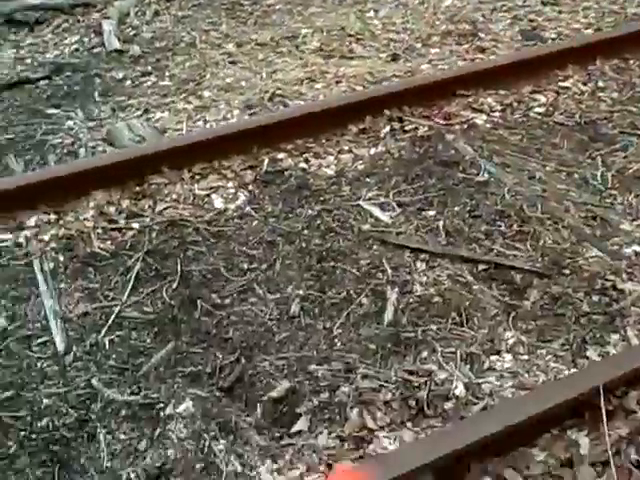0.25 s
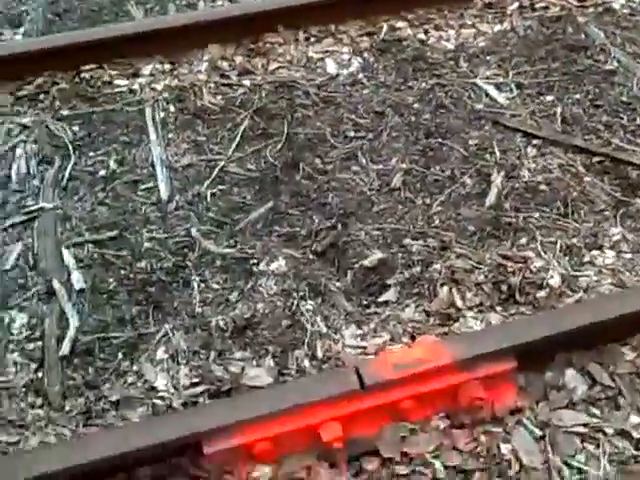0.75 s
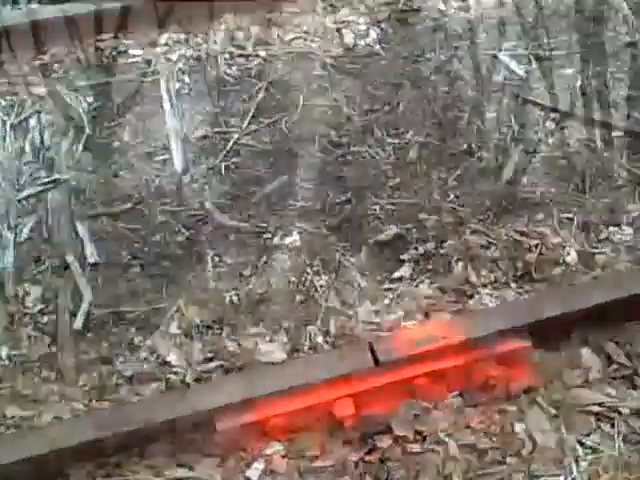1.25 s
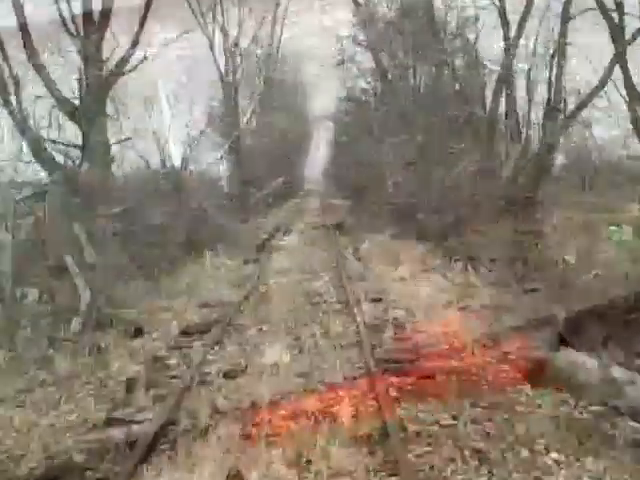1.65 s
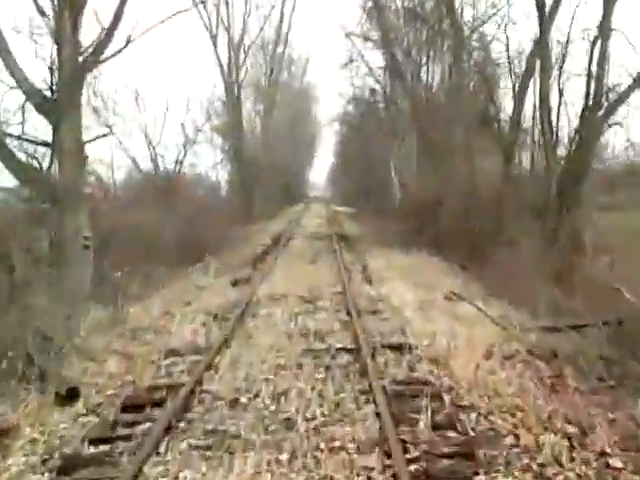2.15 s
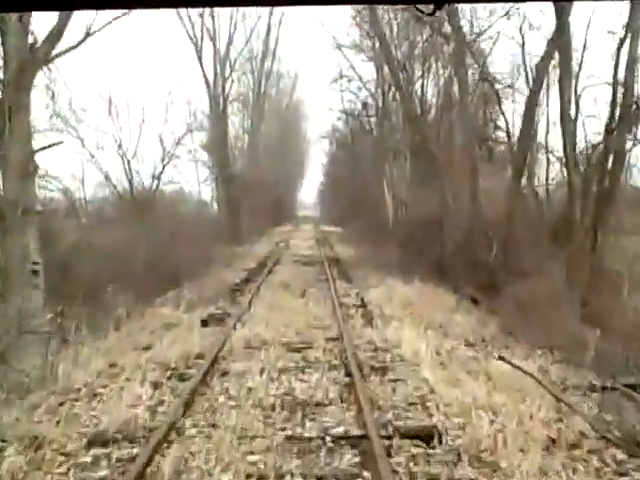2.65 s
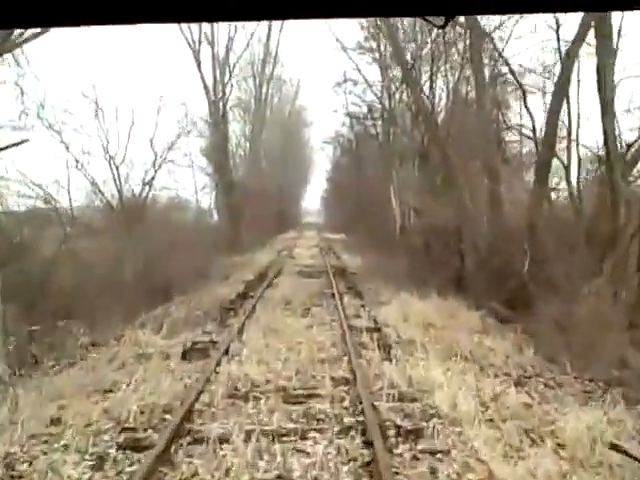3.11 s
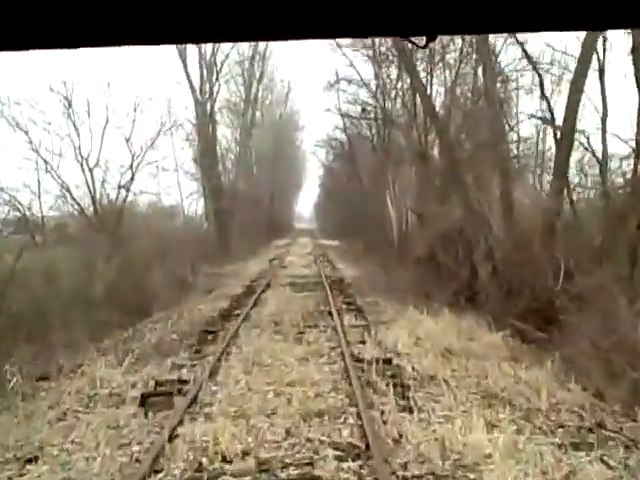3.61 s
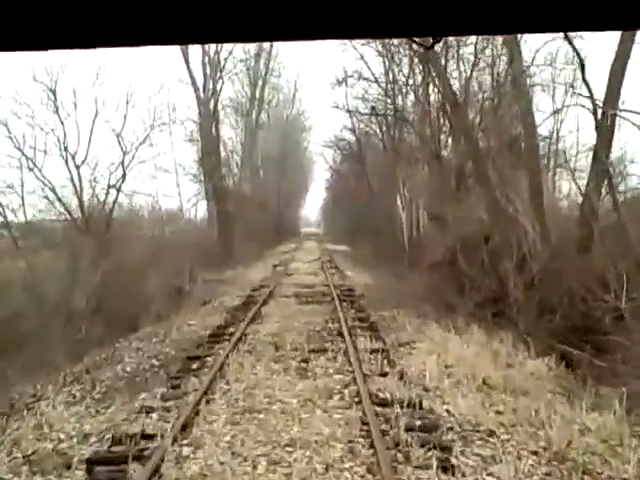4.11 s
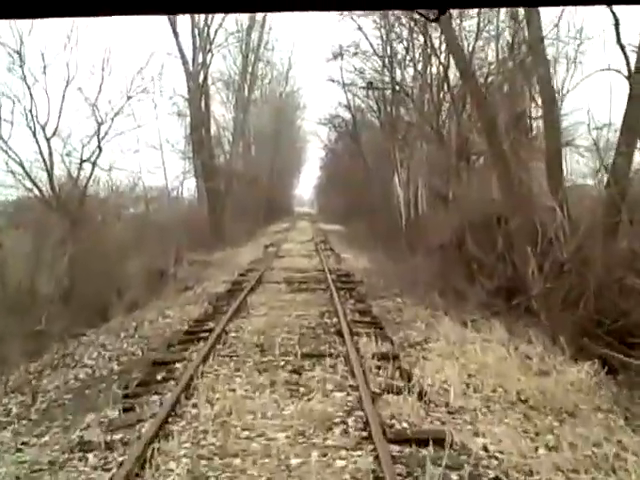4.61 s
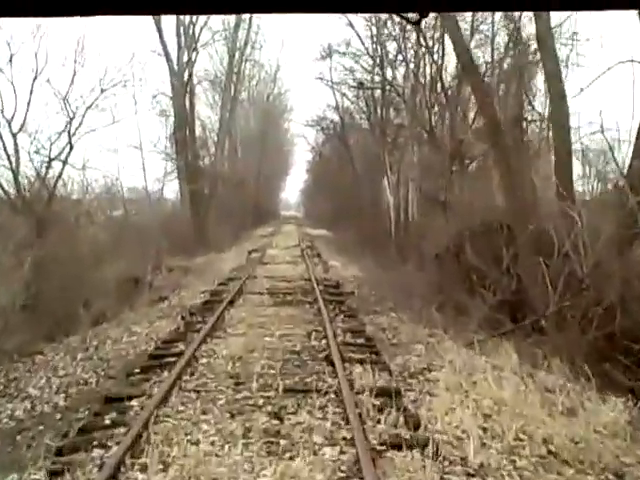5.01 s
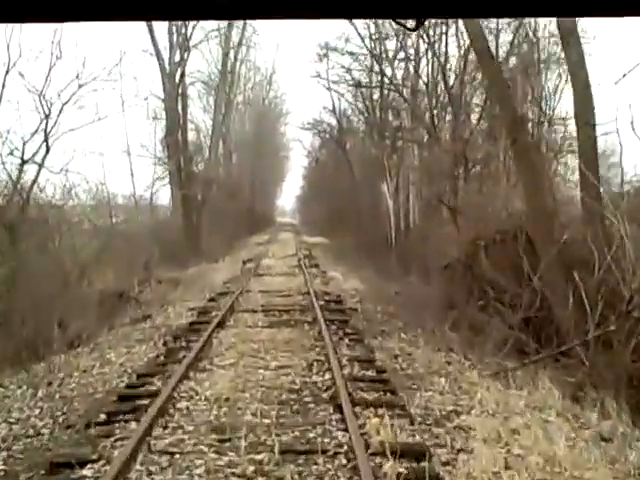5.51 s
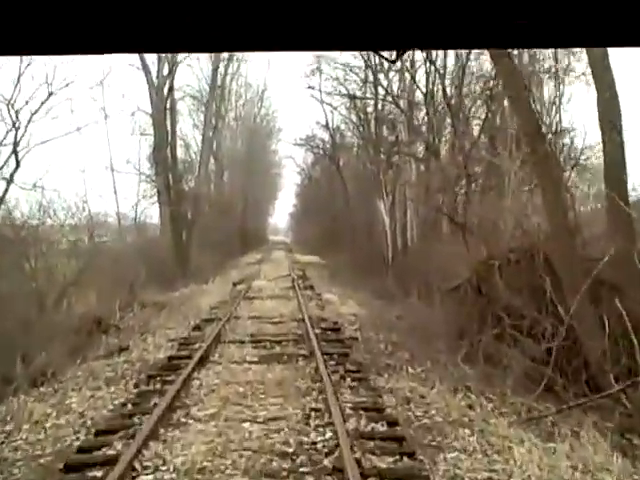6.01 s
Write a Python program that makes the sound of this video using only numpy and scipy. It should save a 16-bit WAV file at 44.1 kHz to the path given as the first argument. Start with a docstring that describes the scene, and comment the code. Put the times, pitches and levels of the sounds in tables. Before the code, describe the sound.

Quick puttering and metallic clatter swell into a rough rail car ride, with bassy rumble, buffeting wind, clanking jolts and the engine straining at the end.

```python
"""A railway track, then the deck of a rail car: a small three-cylinder engine idles at about eight cycles a second.
Exhaust puffs ring as damped oscillations, gear teeth whine at their meshing rate, struck tappets ring in decaying
modes, and coloured noise makes the body rumble and the casing clatter. A cross-fade moves on board, where it is
louder, with wheel rumble and headwind; rail joints shake loose parts and the floor plate.
The loudest bass clips the little microphone's input."""
import sys
import numpy as np
from scipy import signal
from scipy.fft import rfft, irfft, next_fast_len
from scipy.io import wavfile
from scipy.ndimage import map_coordinates

SR = 44100
rng = np.random.default_rng(int(sys.argv[2]) if len(sys.argv) > 2 else 0)


def generate_wav(sig):
    """Save sig (samples, or channels by samples) to the path in sys.argv[1] as 16-bit PCM at SR."""
    pcm = np.round(np.clip(np.atleast_2d(sig).T, -1, 1) * 32767).astype(np.int16)
    wavfile.write(sys.argv[1], SR, pcm)


def boost_factor(decibels):
    """Convert a level in decibels to a linear amplitude factor."""
    exponent = np.asarray(decibels, float) / 20
    return 10 ** exponent


N = 276058
T = np.arange(N) / SR


def unit(x):
    """Normalization: a signal divided by its root mean square has rms 1."""
    return x / np.sqrt(np.mean(x ** 2) + 1e-20)


def curves(rows):
    """Linear interpolation: one value per sample for each column after the time."""
    s, *columns = np.transpose(rows)
    return [np.interp(T, s, column) for column in columns]


def wobble(knots_per_s):
    """Random modulation: a spline through independent normal knots varies smoothly."""
    knots = rng.standard_normal(int(T[-1] * knots_per_s) + 4)
    return map_coordinates(knots, [T * knots_per_s])


def filtered(x, response):
    """Linear filtering: the spectrum is multiplied by a complex response of frequency."""
    size = next_fast_len(N + 8192)
    hz = np.fft.rfftfreq(size, 1 / SR)
    return irfft(rfft(x, size) * response(hz), size)[:N]


def hiss(spectrum):
    """Coloured noise: white noise shaped by a (freq_hz, relative level_db) spectrum and brought to rms 1."""
    f, db = np.transpose(spectrum)

    def colour(hz):
        return boost_factor(np.interp(np.log(hz + 1), np.log(f + 1), db))

    return unit(filtered(rng.standard_normal(N), colour))


def strikes(crank, place, every, scatter_db, scatter_s):
    """Cyclic excitation: impulses of uneven size and timing each time the crank passes a place."""
    s, cycles = np.transpose(crank)
    at = np.arange(-every, cycles[-1], every) + place
    at = at[at >= 0]
    luck = rng.standard_normal((len(at), 2))
    strike_s = np.interp(at, cycles, s) + scatter_s * luck[:, 0]
    samples = np.clip((strike_s * SR).astype(int), 0, N - 1)
    return np.bincount(samples, boost_factor(scatter_db * luck[:, 1]), N)


def exhaust(crank, puff_tables, scatter_db, scatter_s):
    """Pulsed flow in a pipe: each puff pushes out and sucks back; a long one rings."""
    out = np.zeros(N)
    t = np.arange(-SR // 20, SR // 20 + 1) / SR
    for every, puffs in puff_tables:
        for place, db, hz, turns in puffs:
            phase = hz * t - 1 / 4  # in turns; the place is that of the pressure crest
            puff = -boost_factor(db) * np.sin(2 * np.pi * phase) * np.exp(-(phase / turns) ** 2)
            impulses = strikes(crank, place, every, scatter_db, scatter_s)
            out += signal.fftconvolve(impulses, puff, "same")
    return unit(out)


def gear_whine(cycles):
    """Gear meshing: the timing gear sounds a tone at its tooth-passing rate, with wavering phase and level."""
    teeth_per_cycle = 60
    phase = 2 * np.pi * teeth_per_cycle * cycles + .3 * wobble(14)
    return np.sqrt(2) * np.sin(phase) * boost_factor(0.48 * wobble(16))


def ring(modes):
    """Modal response: decaying sines of (freq_hz, relative level_db, t60_s), built up over the contact."""
    contact_s = .004
    t = np.arange(SR // 20) / SR
    modal = sum(boost_factor(db - 60 * t / t60) * np.sin(2 * np.pi * hz * t) for hz, db, t60 in modes)
    return (1 - np.exp(-t / contact_s)) * modal


def tappet(crank, place, rockers, rocker_modes):
    """Impact excitation of modes: the tappet lands firmly and chatters; rocker arms tick too."""
    # tappet modes: freq_hz, relative level_db, t60_s
    tappet_modes = [(3240, 0, .045), (3350, -8, .03), (4130, -9, .02), (5900, -8, .01), (6400, -9, .01),
                    (9800, -12, .006)]
    chatter_db = -14
    # four extra contacts scattered within some milliseconds
    chatter = sum(strikes(crank, place, 1, 2, .003) for _ in range(4))
    taps = strikes(crank, place, 1, 1, .001) + boost_factor(chatter_db) * chatter
    ticks = sum(boost_factor(db) * strikes(crank, at, 1, 3, .0015) for at, db in rockers)
    tapping = signal.fftconvolve(taps, ring(tappet_modes))
    ticking = signal.fftconvolve(ticks, ring(rocker_modes))
    return unit((tapping + ticking)[:N])


def body_rumble(level_db, spectrum):
    """Broadband vibration: coloured noise whose level wavers slowly and quickly."""
    waver_db = 1.4 * wobble(5) + 0.66 * wobble(12) + 0.77 * wobble(40)
    return boost_factor(level_db + waver_db) * hiss(spectrum)


def valve_swell(cycles, valves):
    """Transient envelope: each valve event starts sharply and dies away; the result is in dB."""
    swell_db = 0
    for place, decay, db in valves:
        since = ((cycles - place) % 1) / decay
        swell_db = swell_db + db * (1 - np.exp(-since / 0.14)) * np.exp(-since ** 2 / 2)
    return swell_db


def clatter(swell_db, casing):
    """Superposed micro-impacts: the casing hisses with small metal contacts; valves swell the middle treble most."""

    def middle_treble(hz):
        return 1 / (1 + (3600 / (hz + 1)) ** 6) / (1 + (hz / 12500) ** 6)

    noise = hiss(casing)
    lively = filtered(noise, middle_treble)
    move_db = (1 + 0.076 * wobble(25)) * swell_db
    move_db += 0.99 * wobble(70) + 0.48 * wobble(300) + 0.79 * wobble(6)
    return boost_factor(0.67 * move_db + 0.43 * wobble(30)) * (noise - lively) + boost_factor(move_db) * lively


def engine(crank, idle_db, load_db, rough_db, puff_tables, valves, body, casing,
           tappet_at, rockers, rocker_modes, scatter_db, scatter_s):
    """Superposition at one standpoint: every layer of the engine grows with its load."""
    # gain in dB per dB of load: exhaust, gear whine, tappet, body rumble, clatter
    follows_load = (0.68, 1.05, 1.05, 0.55, 1)
    swell_per_load_db = .025  # growth of the valve swell, as a share, per dB of load
    levels_db = [db + gain * load_db for db, gain in zip(idle_db, follows_load)]
    exhaust_db, whine_db, tappet_db, rumble_db, clatter_db = levels_db
    cycles, = curves(crank)
    swell_db = (1 + swell_per_load_db * load_db) * valve_swell(cycles, valves)
    out = boost_factor(exhaust_db) * exhaust(crank, puff_tables, scatter_db, scatter_s)
    out += boost_factor(whine_db) * gear_whine(cycles)
    out += boost_factor(tappet_db) * tappet(crank, tappet_at, rockers, rocker_modes)
    out += body_rumble(rumble_db + rough_db, body)
    return out + boost_factor(clatter_db) * clatter(swell_db, casing)


def beside_track():
    """Radiation from the standing engine: the idle settles as its load falls steadily."""
    # engine cycles done: time_s, cycles
    crank = [(0, 0), (.6, 4.985), (2, 16.563)]
    # layer levels at idle load: exhaust_db, whine_db, tappet_db, rumble_db, clatter_db
    idle_db = (-27, -39.5, -53, -33, -27)
    # exhaust puffs of every cycle: place_cycles, relative level_db, ring_hz, length_turns
    puffs = [(.315, -19, 185, 2.4), (.27, -8, 100, .5), (.52, -8, 72, .5), (.73, -14, 90, .6),
             (.88, 1, 57, .45)]
    # the idle lopes, puffs of every third cycle: place_cycles (0-3), relative level_db, ring_hz, length_turns
    lope = [(.02, -11, 90, .5), (.07, -6, 130, .5), (.15, -3, 75, .5), (.315, -13, 185, 2.6),
            (1.02, -12, 60, .5), (1.14, 0, 58, .5), (2.02, -8, 130, .5), (2.07, -3, 135, .55),
            (2.16, -3, 70, .5), (2.315, -13, 185, 2.6)]
    # valve gear and injectors: place_cycles, decay_cycles, swell_db before the envelope
    valves = [(.035, .05, 4.5), (.17, .05, -4), (.33, .04, 6.5), (.4, .06, 6.5), (.655, .07, 8.5),
              (.91, .04, 2)]
    # engine block noise: freq_hz, relative level_db per Hz
    block = [(15, -30), (30, -1), (90, -3), (200, -1), (260, -4), (395, -5.5), (441, -6), (576, -10),
             (701, -2), (1050, -13), (1500, -16), (1950, -43), (3300, -120)]
    # casing noise: freq_hz, relative level_db per Hz
    casing = [(710, -42), (1200, -8.5), (1500, -9), (1590, -6), (1750, -6), (2010, -6.5), (3170, -7),
              (4570, -3), (5030, -4), (6170, 1), (8000, -10), (9920, -4), (15800, -22)]
    # rocker arm ticks: place_cycles, level_db relative to the tappet strikes
    rockers = [(.4, 13), (.66, -2)]
    # rocker arm modes: freq_hz, relative level_db, t60_s
    rocker_modes = [(4450, 0, .025), (4250, -4, .02)]
    settle_db_per_s = 1.5
    load_db = -settle_db_per_s * (T - .5)
    return engine(crank, idle_db, load_db, 0, [(1, puffs), (3, lope)], valves, block, casing,
                  .71, rockers, rocker_modes, scatter_db=.8, scatter_s=.0004)


def wind():
    """Turbulent pressure: a headwind buffets the microphone on board, and gusts add their power to it."""
    # wind noise: freq_hz, relative level_db per Hz
    spectrum = [(3, -11), (12, 0), (35, 1), (100, -7.5), (200, -10), (300, -29), (500, -120)]
    # gusts: crest_s, level_db, half_length_s (power down to 1/e)
    gust_rows = [(1.81, -12.5, 0.043), (2.04, -14, 0.036), (2.296, -14, 0.27), (2.862, -10.5, 0.055),
                 (3.193, -12.5, 0.56), (4.1, -18, .3), (4.78, -16, 0.037), (5.54, -13.5, 0.38),
                 (6.15, -11.5, 0.13)]
    headwind_db = -16.5
    gusts = sum(boost_factor(2 * db) * np.exp(-((T - s) / half) ** 2) for s, db, half in gust_rows)
    strength = np.sqrt(boost_factor(2 * headwind_db) + gusts)
    return strength * boost_factor(2.2 * wobble(8)) * hiss(spectrum)


def on_board():
    """Structure-borne sound: the engine under changing load, with the rumble of rolling wheels."""
    # engine cycles done: time_s, cycles
    crank = [(1.3, 0.0), (2.1, 6.632), (2.9, 13.208), (3.6, 18.961), (4.3, 24.668), (5.0, 30.411),
             (5.6, 35.354), (6.26, 40.804)]
    # layer levels at idle load: exhaust_db, whine_db, tappet_db, rumble_db, clatter_db
    idle_db = (-14.5, -30.5, -41, -21, -26)
    # engine load: time_s, load_db over idle
    load_rows = [(1.3, -4), (1.75, -1.5), (2.1, -0.1), (2.5, 0.5), (2.9, -.5), (3.3, 0.9), (3.7, -0.7),
                 (4.6, .3), (4.95, -1.3), (5.3, 1.5), (5.5, 4.5), (5.8, 8), (6.26, 7)]
    # exhaust puffs of every cycle: place_cycles, relative level_db, ring_hz, length_turns
    puffs = [(.075, -8, 100, .5), (.17, -2, 100, .5), (.3, -9, 80, .5), (.375, -12, 90, .5),
             (.54, 0, 66, .45), (.655, -5, 105, .5), (.725, -5, 115, .5), (.805, -4, 95, .5),
             (.925, -7, 110, .5), (.995, -7, 110, .5)]
    # valve gear and injectors: place_cycles, decay_cycles, swell_db before the envelope
    valves = [(.96, .15, 3), (.33, .09, 7), (.7, .09, 2), (.88, .04, -2)]
    # wheel rumble: freq_hz, relative level_db per Hz
    wheels = [(60, -34), (110, -13.5), (160, 0), (200, -3), (269, -8), (375, -3), (445, -5.5), (625, -11),
              (870, -14.5), (1140, -23), (1600, -24.5), (2080, -28.5), (3520, -120)]
    # casing noise: freq_hz, relative level_db per Hz
    casing = [(710, -8.5), (1200, -6), (1320, -8.5), (2080, -4), (2220, -4), (2520, -4), (3230, -3),
              (3560, -5), (6040, 1.5), (8000, -9.5), (9920, -2.5), (11400, -10), (15800, -16)]
    # rocker arm ticks: place_cycles, level_db relative to the tappet strikes
    rockers = [(0.005, -8), (.135, -6), (.68, -9), (.74, -8)]
    # rocker arm modes: freq_hz, relative level_db, t60_s
    rocker_modes = [(4130, 0, .025), (3980, -4, .02)]
    # a rough stretch of track swells the wheel rumble
    rough_at_s, rough_half_s, rough_peak_db = 2.82, 1, 2.5
    rough_db = rough_peak_db * np.exp(-((T - rough_at_s) / rough_half_s) ** 2)
    load_db, = curves(load_rows)
    return engine(crank, idle_db, load_db, rough_db, [(1, puffs)], valves, wheels, casing,
                  .37, rockers, rocker_modes, scatter_db=2.2, scatter_s=.0008)


def joints():
    """Impulsive excitation: each rail joint rattles loose parts and booms in the floor plate's resonances."""
    # wheels over rail joints: start_s, rattle_db and boom_db before the envelope, length_s
    jolts = [(1.342, -23.5, -20, 0.038), (1.83, -21, -14, 0.054), (2.02, -23, -16.5, 0.078),
             (2.485, -11, -10.5, 0.032), (2.5175, -15.5, -9, 0.051), (2.614, -23.5, -17, 0.049),
             (2.7566, -15.5, -8, 0.046), (2.793, -23.5, -13, 0.071), (3.078, -22, -12.5, 0.039),
             (3.5445, -15.5, -15.5, 0.036), (3.867, -18.5, -14, 0.022)]
    # rattle noise: freq_hz, relative level_db per Hz
    rattle_spectrum = [(500, -39), (900, 3), (3000, -2.5), (6000, 1), (8000, -6.5), (10000, -3.5),
                       (16000, -15.5)]
    # floor plate modes: freq_hz, width_hz, relative level_db
    plate_modes = [(354, 67, 5), (413, 51, 5.5), (565, 57, -1.5), (920, 174, -11.5)]
    rise = .2  # share of the length
    rattle, boom = np.zeros(N), np.zeros(N)
    for s, rattle_db, boom_db, length in jolts:
        u = np.clip(T - s, 0, None) / length
        shake = (1 - np.exp(-u / rise)) * np.exp(-u ** 2)
        rattle += boost_factor(rattle_db) * shake
        boom += boost_factor(boom_db) * shake

    def plate(hz):
        response = 0
        for k, (centre, width, db) in enumerate(plate_modes):
            damping = 1j * hz * width
            mode = boost_factor(db) * damping / (centre * centre - hz * hz + damping)
            response = response + (-1) ** k * mode  # neighbouring modes alternate in sign
        return response

    noise = rng.standard_normal(N)
    booming = filtered(boom * noise, plate) / filtered(noise, plate).std()
    return rattle * boost_factor(1.5 * wobble(150)) * hiss(rattle_spectrum) + booming


def scene():
    """Equal-power cross-fade: the standpoint beside the track gives way to the one on board."""
    fade_start_s, fade_s = 1.04, 0.8
    aboard = np.clip((T - fade_start_s) / fade_s, 0, 1)
    near = np.sqrt(1 - aboard ** 2) * beside_track()
    riding = aboard * (on_board() + wind())
    return (near + riding + joints())[None]


def top_cut(x):
    """Nothing passes above the cut-off."""
    return signal.sosfilt(signal.butter(12, 15920, fs=SR, output="sos"), x)


def record(dry):
    """Saturation and band limiting: the input clips at full scale; nothing passes above the limit."""
    top_hz = 15930
    clipped = dry / (1 + np.abs(dry) ** 12) ** (1 / 12)
    mix = filtered(clipped[0], lambda hz: hz < top_hz)[None]
    return top_cut(mix)


dry = scene()
out = record(dry)
generate_wav(out)
```